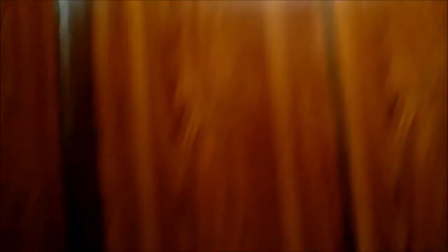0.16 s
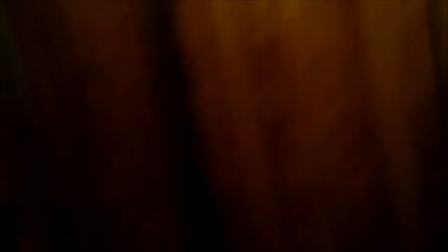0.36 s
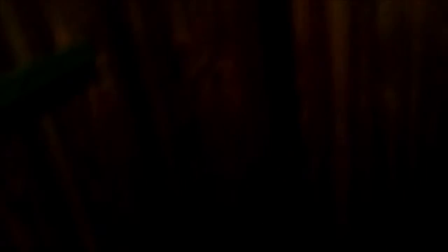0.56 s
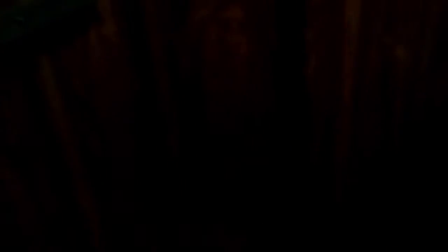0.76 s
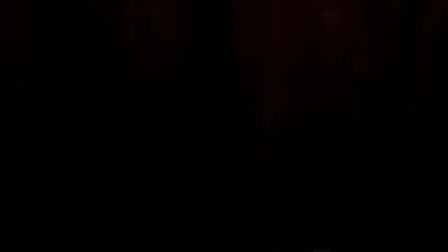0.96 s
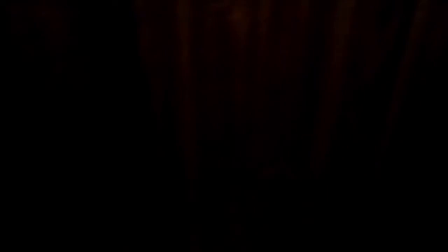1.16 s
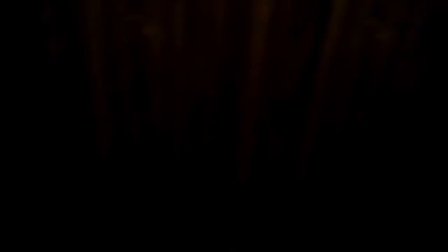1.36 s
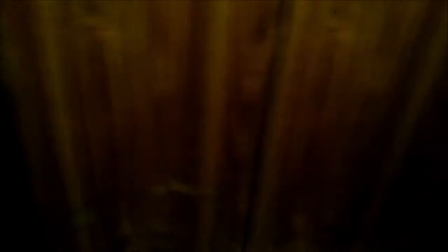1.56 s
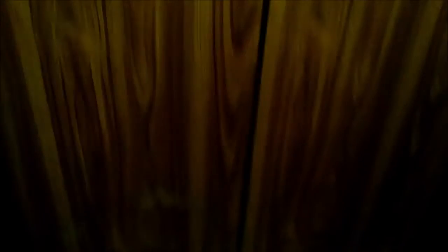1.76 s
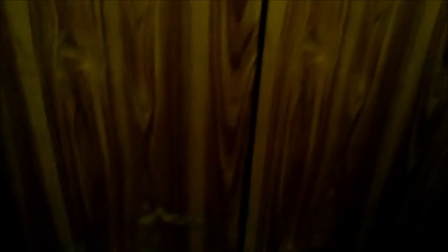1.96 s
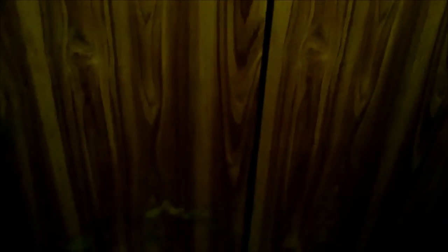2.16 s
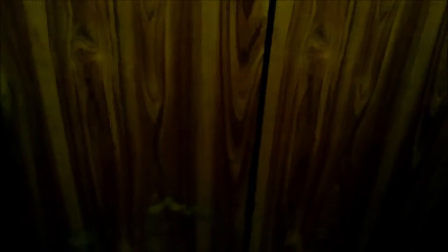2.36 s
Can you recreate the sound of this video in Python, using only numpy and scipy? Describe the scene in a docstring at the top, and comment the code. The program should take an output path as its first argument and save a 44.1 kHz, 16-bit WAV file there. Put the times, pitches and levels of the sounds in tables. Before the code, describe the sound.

An old elevator door rubs along its track, then closes with a clack and thud.

```python
"""Old lift door sliding shut

Inside a wood-panelled cabin, sharp knocks set the door off and it rubs and hisses along its track.
It clacks against the frame, ringing its panel and metal catch and shaking a loose fitting, then
settles into the cabin shell with a low thud. Ventilation, a faint hum and a thin whine sit underneath."""
import sys
import numpy as np
from scipy import signal
from scipy.fft import rfft, irfft
from scipy.io import wavfile

SR = 44100
rng = np.random.default_rng(int(sys.argv[2]) if len(sys.argv) > 2 else 0)


def master(y):
    """Save y as 16-bit WAV."""
    cut = np.clip(np.atleast_2d(y).T, -1, 1)
    pcm = np.round(cut * 32767)  # scale
    wavfile.write(sys.argv[1], SR, pcm.astype(np.int16))


N = 110250
T = np.arange(N) / SR

# Fader curves for the track rub, its treble hiss and the cabin rumble: time_s, level_db
RUB_FADER = [(0.03, -127), (0.07, -55), (0.19, -59), (0.27, -49.5), (0.42, -51), (0.5, -52.5), (0.62, -49),
             (0.8, -52.5), (0.88, -52), (1.0, -60), (1.07, -55.5), (1.15, -52), (1.22, -53), (1.32, -55),
             (1.41, -63.5), (1.5, -78)]
HISS_FADER = [(0.04, -84), (0.07, -66.5), (0.2, -69), (0.3, -66), (0.4, -60.5), (0.5, -60), (0.62, -55.5),
              (0.78, -60.5), (0.9, -64), (1.0, -69.5), (1.14, -65.5), (1.33, -75.5), (1.44, -100)]
RUMBLE_FADER = [(0, -45), (0.06, -54), (0.16, -48.5), (0.2, -62), (0.3, -43.5), (0.43, -52.5), (0.51, -67),
                (0.75, -72), (1.0, -75), (1.23, -58), (1.4, -53.5), (1.72, -55), (1.88, -57.5),
                (2.05, -61.5), (2.5, -66.5)]
# Tight spots on the track, each a resonant swell: peak_s, level_db, spread_s, pitch_hz, nominal_width_hz
DRAGS = [(0.334, -56, 0.042, 4020, 600), (0.336, -55.5, 0.039, 820, 450), (0.386, -52, 0.053, 2220, 322),
         (0.41, -79, 0.037, 11000, 1300), (0.457, -55.5, .018, 1410, 130),
         (0.57, -79.5, 0.048, 10400, 1200), (0.573, -52, 0.054, 527, 153), (0.726, -52, 0.023, 594, 390),
         (0.876, -54, 0.047, 2700, 129), (0.878, -53.5, 0.018, 2300, 170), (0.96, -57, 0.076, 2080, 280),
         (1.109, -44, 0.028, 663, 324), (1.11, -80, .035, 9700, 1200), (1.145, -55, 0.03, 2160, 417),
         (1.179, -49, 0.051, 520, 344), (1.318, -64, 0.034, 3300, 647), (1.778, -62.5, 0.0075, 1460, 700),
         (1.805, -60, 0.023, 1490, 600), (2.005, -69, 0.15, 2350, 1840)]

# Short dry knocks: start_s, body_db, snap_db, tick_db, boom_db
KNOCKS = [(0.0919, -29, -14.5, -24.5, -48.5), (0.2274, -24, -31, -54, -38), (0.2432, -33, -25, -29, -60),
          (0.2466, 1.5, -1.5, -40, -32), (1.7703, -58, -39, -53, -67), (2.2157, -36, -34, -39, -68)]
# The door meets the frame, rebounds and seats: start_s, clack_db, panel_db, thud_db
FRAME_HITS = [(1.4251, -32, -33.5, -54), (1.4308, -31.5, -26.5, -62), (1.443, -32.5, -22, -55),
              (1.482, -43.5, -27.5, -36), (1.511, -55, -46, -39), (1.533, -36, -27.5, -25.5),
              (1.548, -50, -32.5, -21.5), (1.584, -58, -44.5, -25.5), (1.642, -65, -41, -44),
              (1.874, -64, -59.5, -53.5)]
# Hits on the cabin wall, door edge, metal catch and loose fitting: start_s, level_db
WALL_BUMPS = [(0.251, -28), (0.266, -26), (0.282, -30.5), (0.346, -41.5), (0.384, -40.5), (0.426, -36.5),
              (2.209, -45.5)]
EDGE_HITS = [(1.4281, -29.5), (1.4343, -31.5)]
CATCH_HITS = [(1.4323, -43.5), (1.53, -49.5), (1.546, -46.5)]
FITTING_HITS = [(1.468, -42), (1.492, -51), (1.518, -33.5), (1.549, -41), (1.596, -40.5)]

# The four damped layers of a knock: pitch_hz, gain_db, t60_s
BODY_MODES = [(358, -3, 0.01), (499, 0, 0.0084), (910, -43, 0.0034)]
SNAP_MODES = [(1516, -18.5, 0.011), (2240, -15, 0.0087), (3380, -35, 0.0045), (4150, -25, 0.0038),
              (7220, -33, 0.0048)]
TICK_MODES = [(1650, -5, 0.00074), (3370, -8.5, 0.0073), (4800, -8, 0.00083)]
CRACK_MODES = [(8300, -46, 0.0042), (9200, -65, 0.0052), (12000, -54, 0.0025)]
# The ring of each struck part of the door and cabin: pitch_hz, gain_db, t60_s
PANEL_MODES = [(239, 6, 0.18), (281, 1, 0.52), (382, -10.5, 0.18), (526, -7.5, 0.12), (866.4, -7, 0.16),
               (904, -6.5, 0.21), (975, -10.5, 0.21), (1038, -16.5, 0.26), (1120, -15, 0.17),
               (1197, -23, 0.28), (1338, -14, 0.21), (1522, -11, 0.18), (1890, -21, 0.12),
               (1966, -16.5, 0.22)]
SHELL_MODES = [(60.7, -23.5, 0.66), (86.5, -11.5, 0.45), (145.2, -1.5, 0.31), (187.5, -5, 0.35),
               (248, -12, 0.32), (277.1, -5.5, 0.27), (308.3, -0.5, 0.15)]
WALL_MODES = [(198, -6, 0.047), (271, -4, 0.13)]
EDGE_MODES = [(920, -5.5, 0.086), (1349, 0, 0.085), (1900, -12.5, 0.06), (2190, -15, .14),
              (3440, -17, 0.042), (5320, -13, 0.051), (6160, -22, .04)]
CATCH_MODES = [(2650, -7.5, 0.083), (3240, -2.5, 0.15), (3510, -9.5, 0.22), (5120, -23, 0.12),
               (5700, -10.5, 0.087), (5860, -19, 0.24), (8060, -23, 0.065), (11600, -26, 0.11),
               (11860, -29, 0.078)]
FITTING_MODES = [(1565, -2.5, 0.058), (1680, -16, .05)]
# The clack's tail by band, highs dying first: centre_hz, t60_s
CLACK_DECAY = [(300, 0.42), (1500, 0.3), (5000, 0.14), (12000, 0.062)]

# Tone curves of the noise layers: frequency_hz, relative_db
RUB_EQ = [(80, 1.5), (400, -4), (850, -2.5), (1120, -5), (1480, 1), (1850, -2.5), (2200, 2), (2950, -2),
          (3600, -11.5), (4400, -16), (6500, -47), (8000, -39.5)]
HISS_EQ = [(2500, -12), (3600, 2), (4600, 7), (6000, 4.5), (7000, -2.5), (8000, -29), (11200, -20),
           (15000, -41.5)]
RUMBLE_EQ = [(25, -22), (60, -4), (110, -2.5), (170, 2), (270, 2.5), (360, -8.5), (600, -25), (1500, -66.5)]
BOOM_EQ = [(30, -38), (100, -18), (190, -6), (270, 0.5), (340, -9.5), (500, -14), (900, -21.5), (2500, -30),
           (6000, -40.5), (8000, -73)]
CLACK_EQ = [(150, -2.5), (350, 10.5), (700, -0.5), (950, -1), (1400, -2.5), (2100, -1.5), (2500, -14),
            (3000, -11), (4300, -12.5), (5300, -12.5), (6200, -12.5), (6700, -25.5), (8000, -33.5),
            (12500, -44), (15000, -60)]
THUD_EQ = [(25, -18), (60, -14), (120, 0.5), (280, 2), (400, -11.5), (600, -14.5), (1000, -33.5),
           (2500, -42)]
VENT_EQ = [(25, -11), (66, -9.5), (113, -2), (247, -13), (330, -10), (480, -11.5), (650, -18.5),
           (1020, -18.5), (1560, -17.5), (2500, -21.5), (3300, -29), (5000, -35), (6200, -34.5),
           (7050, -41.5), (8000, -52), (12000, -50.5), (15500, -65)]


def door_knocks():
    """Heavily damped knocks with a bright crack, then the cabin's boom and soft bumps of its wall."""
    starts, body_db, snap_db, tick_db, boom_db = np.transpose(KNOCKS)
    knock = strike(starts, body_db, BODY_MODES)
    knock += strike(starts, snap_db, SNAP_MODES)
    knock += strike(starts, tick_db, TICK_MODES)
    knock = roll_off(knock, "low", hz=7000)  # the give of the contact dulls the top
    crack = strike(starts, snap_db, CRACK_MODES)
    boom = hit_envelope(starts, boom_db, rise_s=0.0012, t60_s=0.24) * noise(BOOM_EQ)
    bumps = strike(*np.transpose(WALL_BUMPS), WALL_MODES)
    return knock + crack + boom + bumps


def door_slide():
    """The door rubs and hisses along its track, drags on tight spots and shakes the cabin."""
    rub = fader(RUB_FADER) * friction(RUB_EQ, grain_db=1.5)
    hiss = fader(HISS_FADER) * friction(HISS_EQ, grain_db=2.0)
    track = (rub + hiss) * from_db(0.8 * wobble())  # the runners roll unevenly
    for peak_s, db, spread_s, hz, width_hz in DRAGS:
        swell = from_db(db) * np.exp(-0.5 * ((T - peak_s) / spread_s) ** 2)
        track += swell * noise(resonance(hz, width_hz))
    return track + fader(RUMBLE_FADER) * noise(RUMBLE_EQ)


def friction(eq, grain_db, grain_samples=32, step_s=0.125):
    """Countless tiny slips of uneven size; the resonances they excite shift along the track."""
    grain = np.repeat(rng.standard_normal(N // grain_samples + 1), grain_samples)[:N]
    slips = rng.standard_normal(N) * from_db(grain_db * grain)
    rub = np.zeros(N)
    for centre_s in np.arange(0, T[-1], step_s):
        crossfade = np.sqrt(np.maximum(1 - np.abs(T - centre_s) / step_s, 0))
        rub += crossfade * door_ripple(slips, depth_db=4)
    return equalise(rub, eq)


def door_ripple(x, depth_db, spacing_hz=45):
    """The door's dense small resonances ripple the spectrum, less so in the bass."""
    hz = np.arange(N // 2 + 1) * SR / N
    ripple = np.interp(hz / spacing_hz, np.arange(2000), rng.standard_normal(2000))
    return irfft(rfft(x) * from_db(depth_db * ripple * hz / (hz + 600)), N)


def door_shut():
    """Hard contacts clack and ring the panel; the door's weight then thuds into the cabin shell."""
    starts, clack_db, panel_db, thud_db = np.transpose(FRAME_HITS)
    panel = strike(starts, panel_db - 7.5, PANEL_MODES, scatter_db=2)
    panel = roll_off(panel, "high", hz=172)  # the panel radiates little bass
    shell = strike(starts, thud_db - 2.5, SHELL_MODES, scatter_db=2)
    thud = hit_envelope(starts, thud_db - 4, rise_s=0.0008, t60_s=0.39) * noise(THUD_EQ)
    return panel + shell + thud + frame_clack(starts, clack_db)


def frame_clack(starts, levels_db):
    """Each contact excites the door's dense resonances in a burst that darkens as it dies."""
    texture = door_ripple(rng.standard_normal(N), depth_db=3.5)
    spectrum = rfft(equalise(texture, CLACK_EQ))
    hz = np.maximum(np.arange(len(spectrum)) * SR / N, 1)
    centres_hz, t60s = np.transpose(CLACK_DECAY)
    clack = np.zeros(N)
    for band_weights, t60_s in zip(np.eye(len(centres_hz)), t60s):
        band = irfft(spectrum * np.interp(np.log(hz), np.log(centres_hz), band_weights), N)
        clack += band * hit_envelope(starts, levels_db, rise_s=0.0032, t60_s=t60_s)
    return clack


def door_hardware():
    """The door edge clangs, the metal catch rings as it drops home and a loose fitting rattles."""
    parts = (EDGE_HITS, EDGE_MODES), (CATCH_HITS, CATCH_MODES), (FITTING_HITS, FITTING_MODES)
    return sum(strike(*np.transpose(hits), modes, scatter_db=2) for hits, modes in parts)


def room_tone():
    """A bed of ventilation noise with a faint two-note hum and a thin, unsteady whine."""
    hum = sum(tone(db, cycles=hz * T + rng.random()) for hz, db in [(247.6, -68.5), (306.8, -69)])
    whine_hz = 12390 + 30 * wobble()
    whine = tone(db=-93 + 2 * wobble(), cycles=np.cumsum(whine_hz) / SR)
    return from_db(-59.5) * noise(VENT_EQ) + hum + whine


def strike(starts, levels_db, modes, scatter_db=0):
    """Hits set damped modes ringing; scatter varies each mode's strength from hit to hit."""
    out = np.zeros(N)
    offsets_db = scatter_db * rng.standard_normal((len(starts), len(modes)))
    age = T[:SR // 2]
    for k, (hz, mode_db, t60_s) in enumerate(modes):
        ring = (-1) ** k * np.sin(2 * np.pi * hz * age) * from_db(-60 * age / t60_s)
        for start_s, hit_db, offset_db in zip(starts, levels_db, offsets_db[:, k]):
            i = int(start_s * SR)
            out[i:i + len(ring)] += ring[:N - i] * from_db(mode_db + hit_db + offset_db)
    return out


def hit_envelope(starts, levels_db, rise_s, t60_s):
    """Attack and tail of dense ringing; overlapping hits add in energy."""
    age = np.maximum(T - starts[:, None], 0)
    attack = 1 - np.exp(-age / rise_s)
    tail = from_db(levels_db[:, None] - 60 * age / t60_s)
    return np.sqrt(np.sum((attack * tail) ** 2, axis=0))


def resonance(pitch_hz, width_hz):
    """EQ curve of a steep-sided band, 1.5 times width_hz across at -6 dB."""
    hz = np.geomspace(100, 16000, 600)
    detuning = (hz ** 2 - pitch_hz ** 2) / (hz * width_hz * 1.5)
    return np.c_[hz, -20 * np.log10(1 + detuning ** 4)]


def equalise(x, eq):
    """Shape a sound with an EQ curve, rolling off past both ends; rms 1."""
    hz = np.maximum(np.arange(N // 2 + 1) * SR / N, 1)
    points_hz, points_db = np.transpose(eq)
    gain = from_db(np.interp(np.log(hz), np.log(points_hz), points_db))
    low_cut = np.minimum(hz / points_hz[0], 1) ** 2
    high_cut = np.minimum(points_hz[-1] / hz, 1) ** 2
    shaped = irfft(rfft(x) * gain * low_cut * high_cut, N)
    return shaped / np.std(shaped)


def noise(eq):
    """Steady noise through an EQ curve; rms 1."""
    return equalise(rng.standard_normal(N), eq)


def wobble():
    """Quick random modulation, mostly 10 to 50 Hz; rms 1."""
    return noise([(10, 0), (50, 0)])


def tone(db, cycles):
    """A sine at an rms level, its phase counted in cycles."""
    return np.sqrt(2) * from_db(db) * np.sin(2 * np.pi * cycles)


def roll_off(x, passband, hz, order=2):
    """A gentle low-pass or high-pass."""
    return signal.sosfilt(signal.butter(order, hz, passband, fs=SR, output="sos"), x)


def fader(curve):
    """Gain over time from a fader curve."""
    return from_db(np.interp(T, *np.transpose(curve)))


def from_db(db):
    """Decibels to gain."""
    return 10 ** (np.asarray(db) / 20)


def scene():
    """The mono mix inside the cabin."""
    return (door_slide() + door_knocks() + door_shut() + door_hardware() + room_tone())[None]


def record(dry):
    """Master EQ: ease off the deepest bass and cut the very top steeply."""
    trimmed = roll_off(dry, "high", hz=25, order=1)
    top_cut = signal.ellip(10, 0.1, 70, 15500, fs=SR, output="sos")
    return signal.sosfilt(top_cut, trimmed)


dry = scene()
out = record(dry)
master(out)
```